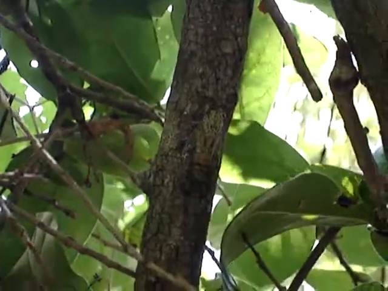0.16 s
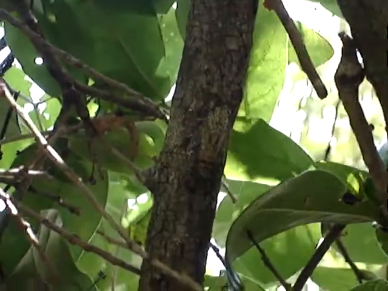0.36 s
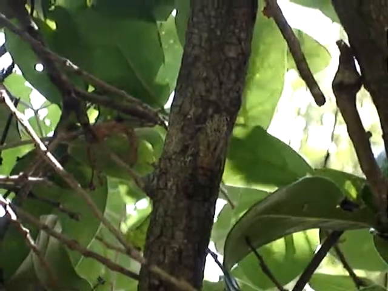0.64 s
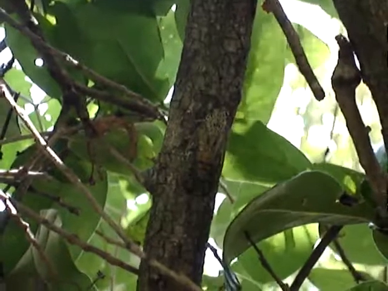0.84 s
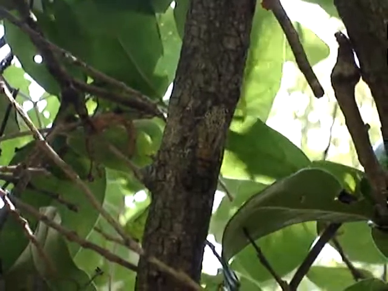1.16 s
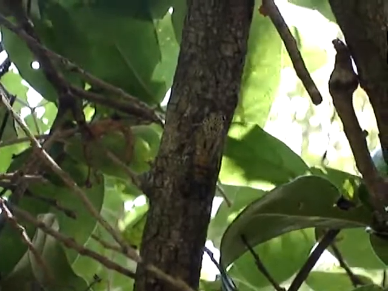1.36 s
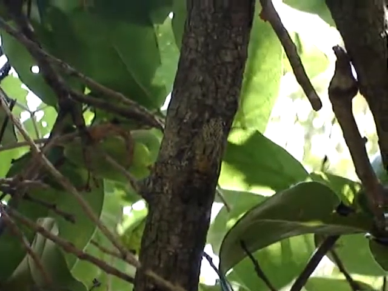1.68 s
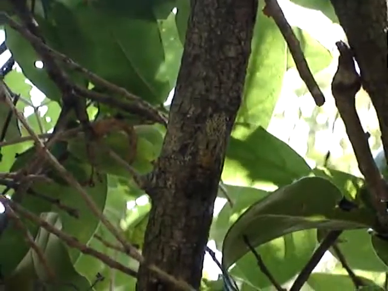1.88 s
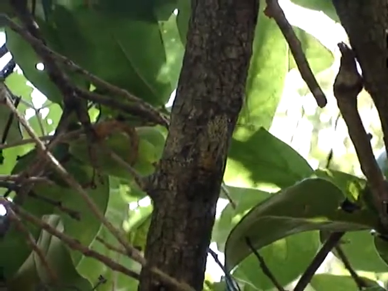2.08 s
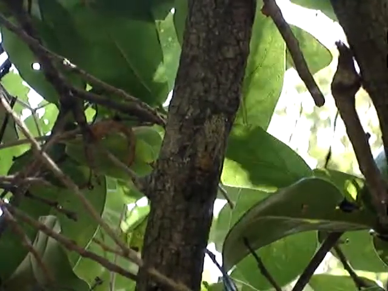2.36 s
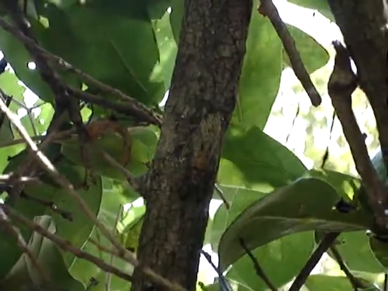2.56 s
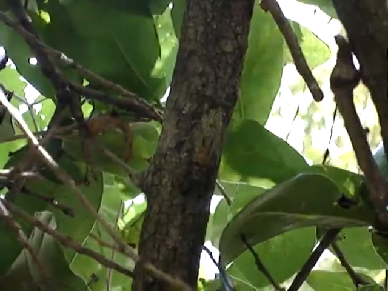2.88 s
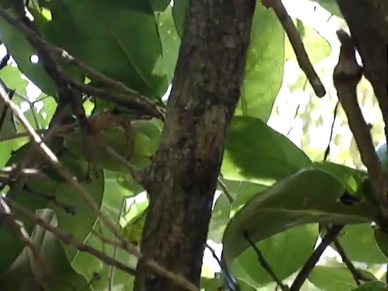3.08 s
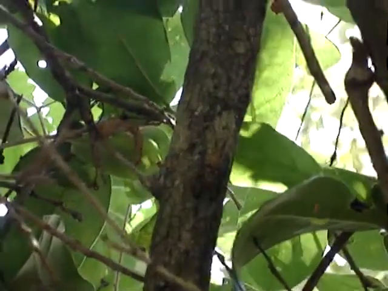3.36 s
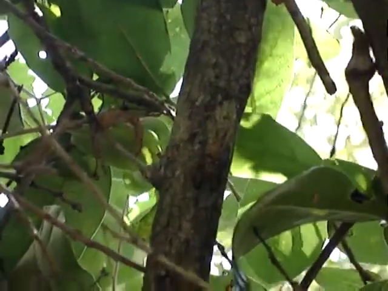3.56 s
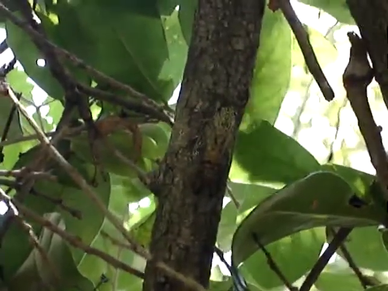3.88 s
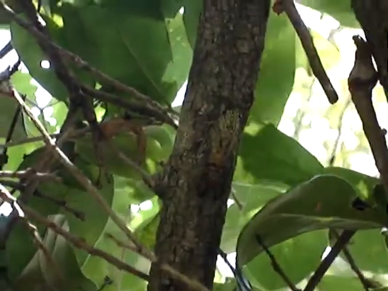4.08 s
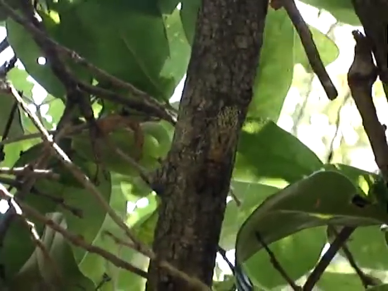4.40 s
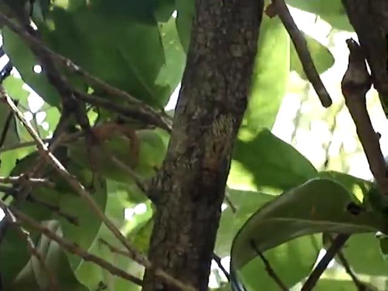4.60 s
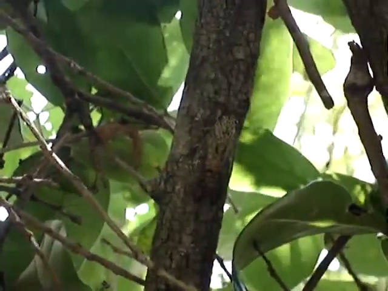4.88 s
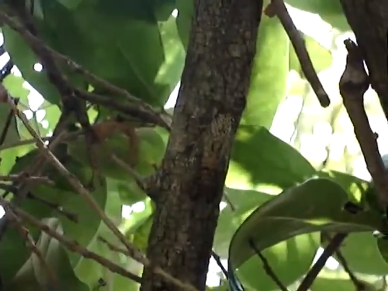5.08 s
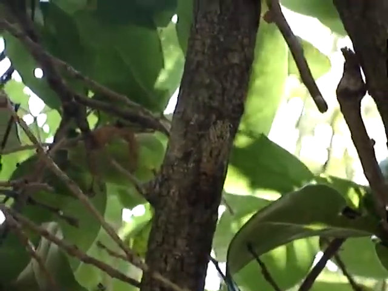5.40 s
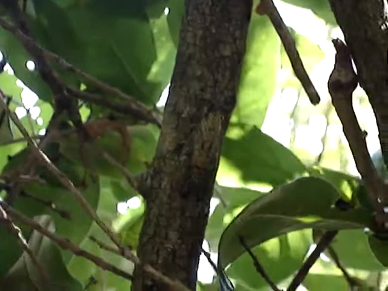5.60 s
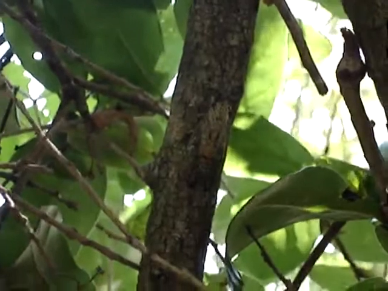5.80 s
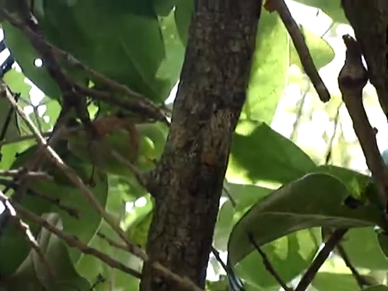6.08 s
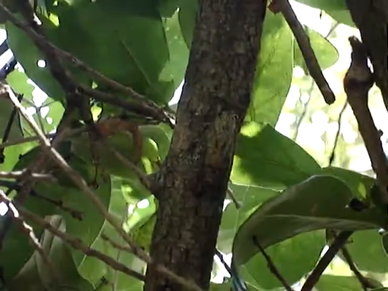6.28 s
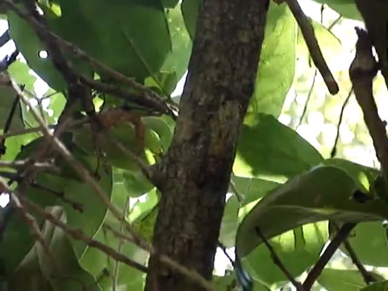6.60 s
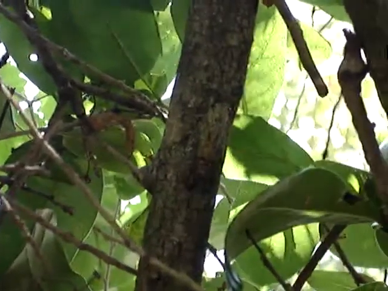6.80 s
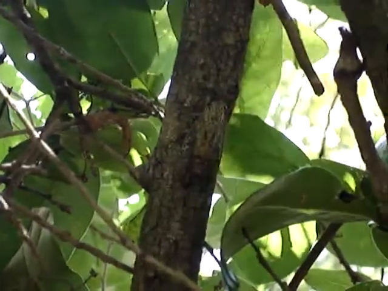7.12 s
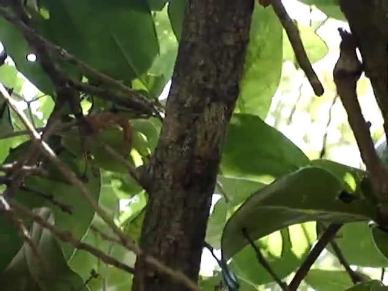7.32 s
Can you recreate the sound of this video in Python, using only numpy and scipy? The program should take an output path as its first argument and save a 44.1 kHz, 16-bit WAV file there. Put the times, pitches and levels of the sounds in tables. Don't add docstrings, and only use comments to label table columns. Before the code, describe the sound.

From 0 s a cicada very close by sings a loud, raspy, high buzz of rapid pulses around 4-5 kHz. Each phrase speeds up and brightens into a piercing 9-10 kHz ring, peaking near 0.3, 0.8, 1.3, 1.8, 2.3, 3.0 and 3.7 s, then breaks off for an instant and restarts slower. A second cicada, farther away and smeared by leaves, swells between these peaks. From about 3.9 to 5.2 s the near song is a coarser, slowing rattle, then it rests. The far one stands out, surging at 5.4, 6.05 and strongest at 6.4 s. At 6.54 s the near singer returns with quick, crowded shrill bursts until the end at about 7.45 s. Throughout, much quieter, there is distant tyre roar, fullest around 2-3 s, a faint motor hum sinking in pitch, soft leaf hiss, and low wind puffs, clearest near 5.7-6 s.

```python
import sys
import numpy as np
from scipy import signal
from scipy.io import wavfile
from scipy.ndimage import uniform_filter1d

SR = 44100
rng = np.random.default_rng(int(sys.argv[2]) if len(sys.argv) > 2 else 0)


def voltage_ratio(decibels):
    exponent = np.asarray(decibels, float) / 20
    return 10 ** exponent


def pcm_store(signal):
    levels = np.round(np.clip(np.atleast_2d(signal), -1, 1) * 32767)
    wavfile.write(sys.argv[1], SR, levels.astype(np.int16).T)


N = 328545

# start in seconds, end in seconds, drone level in dB,
# slowest speed in buckles per second, later climb in buckles per second each second.
STRETCHES = [(0, 0.412, -28, 200, 453.5), (0.445, .925, -27.5, 192, 332.5), (.957, 1.438, -27, 192, 379.5),
             (1.466, 1.73, -26.5, 189, 350.5), (1.752, 1.919, -26, 250, 0), (1.947, 2.431, -27, 196, 310.5),
             (2.461, 2.832, -25.5, 186, 158.5), (2.868, 2.909, -27, 222, 0), (2.921, 3.14, -26, 240, 0),
             (3.169, 3.541, -25.5, 184, 125.5), (3.578, 3.833, -23.5, 225, -6),
             (3.86, 4.457, -24.5, 194, -65), (4.474, 4.526, -24, 162, 0), (4.576, 5.175, -23, 146, -64.5),
             (5.2, 5.249, -23, 112, 0), (6.54, 6.825, -23, 255, -77.5), (6.84, 6.958, -22.5, 266, 0),
             (6.968, 7.328, -24.5, 300, -380), (7.338, 7.452, -23.5, 255, 0)]
# loudest moment in seconds, time the shrill ring is held in seconds,
# loudest level in dB, speed in buckles per second.
CLIMAXES = [(0.299, .115, -17.5, 338), (.818, .107, -16.5, 337), (1.322, .115, -16.5, 337),
            (1.808, .111, -16.5, 341), (2.318, .115, -16, 338), (3.018, .123, -16, 340),
            (3.703, .131, -16, 341), (6.638, 0.081, -16, 353), (6.835, .03, -16.5, 350),
            (6.96, 0.041, -16.5, 340), (7.105, 0.13, -16.5, 337), (7.333, .042, -19, 345)]
# time from the loudest moment in seconds, share taken over from the drone (0-1),
# level against the loudest in dB, shrill ring against the body in dB.
CLIMAX_BUILD = [
    (-.1, 0.037, -2.5, -9),
    (-.045, 0.44, -3, -5.5),
    (-.022, 0.92, -2.5, -8),
    (0, 0.88, 0, 5),
    (0.017, 0.88, -1, 7.5),
    (.048, 0.97, -5.5, 7.5),
]
# speed in buckles per second, shrill ring against the body in dB.
DRONE_RING = [(235, -8.5), (285, -7)]
# extra ring in dB, fade in seconds.
RESTART_RING = (3.5, 0.046)
# time in milliseconds, then drive of body, overtone and shrill ring in dB.
RIBS = [
    (.75, -9, -9, -5),
    (1.4, 0, 0, -1),
    (2.05, -5, -8, 0),
    (2.6, -14, -13, -12),
]
# shrill ring in dB, body note in Hz, snap in dB, overtone in dB,
# overtone in Hz; levels are against the body.
BELLY_STRETCH = [(-5.5, 4232, -12.5, -2.5, 8280), (0.5, 4596, -17, -3, 8710),
                 (4.5, 4624, -15.5, -10.5, 8000), (7.5, 5030, -7, -15, 6800)]
ROUGHNESS = [(285, .37), (335, .17)]
# frequency in Hz, level in dB.
AIR_SAC_MODES = [(9255, 1.5), (9617, 2), (9820, -2), (9030, -7.5)]
# time in seconds, level in dB.
FAR_DRONE = [(0, -34), (.4, -57), (3.86, -60), (4.2, -33), (5.5, -29), (6.55, -33.5), (6.8, -61),
             (7.3, -50), (7.45, -39.5)]
# loudest moment in seconds, level in dB, speed in buckles per second.
FAR_SWELLS = [(1.12, -29, 360), (1.72, -28.5, 360), (2.21, -27.5, 360), (2.85, -24.5, 360),
              (3.5, -24.5, 360), (4.09, -28.5, 360), (4.73, -22.5, 360), (5.43, -20.5, 368),
              (6.05, -27, 296), (6.43, -18, 370), (6.65, -25.5, 270)]
# time from the loudest moment in seconds, level against the loudest in dB,
# share of the speed gained (0-1), shrill ring against the body in dB.
SWELL_SHAPE = [
    (-.4, -39.5, 0.028, 2.5),
    (-.1, -10, .2, 0),
    (-.04, -2.5, .9, 0),
    (0, 0.5, 1, 1.5),
    (.04, -3, .95, -0.5),
    (.065, -5.5, .3, -0.5),
    (.3, -29, 0.015, -1.5),
]
# time in seconds, level in dB.
ROAD_LEVEL = [(0, -37), (.75, -34), (1.7, -29.5), (2.3, -30), (3, -29), (3.5, -31.5), (4.1, -32.5),
              (5.44, -34.5), (6, -31), (6.58, -30.5), (6.67, -35.5), (7.45, -41.5)]
# frequency in Hz, level in dB per Hz.
ROAD_COLOUR = [(12, -43), (20, -6), (43, -16), (108, -10), (173, -13.5), (233, -6.5), (283, -9), (434, -3),
               (597, -3.5), (896, 1.5), (1210, -2.5), (2500, -22), (3300, -24.5), (4290, -48), (7260, -120)]
# time in seconds, first order in Hz, first order in dB, second order in dB.
MOTOR = [(0, 244, -57.5, -53), (1.19, 245, -40.5, -50), (1.5, 241, -49.5, -47), (2.74, 228, -47.5, -42.5),
         (3.82, 215.5, -57.5, -45.5), (4.6, 212.3, -58, -44.5), (5.25, 209, -54, -53.5),
         (6.6, 210.4, -46.5, -45)]
# centre in seconds, level in dB, half length in seconds.
GUSTS = [(.74, -53.5, 0.097), (2.88, -48, .15), (3.318, -49, 0.059), (3.62, -43, .06), (4.3, -52, 0.14),
         (4.9, -52.5, 0.43), (5.699, -38, 0.14), (5.952, -37, 0.023), (6.199, -48, 0.2), (6.559, -47, .1),
         (7.1, -54.5, 0.42)]

HOLD_SAG_PER_S, LET_GO_S, SLOW_DOWN_S = 70, .025, .06
SETTLE_S, SPURT_AFTER_CLIMAX, SPURT_AFTER_CATCH = .12, 60, 24
LEAD_IN_S, LEAD_IN_DB, LEAD_IN_PER_S = .018, -15, 130
CATCH_ON_DB, CATCH_ON_S = -1, .015
CATCH_ACCENT_DB, CATCH_ACCENT_S = 4, .026
ENTRY_DB, ENTRY_S = -11, .037
WIND_UP_DB, WIND_UP_RING_DB, WIND_UP_S = 2.5, 7, .012
SHAKE_RAD = 1.7
BODY_LEAD_DB = 2
FAR_PER_S, FAINT_DB, FAINT_DULLING = 258, -40, 1
FAR_PITCH = 1.004
RUSTLE_DB, CALM_DB = -51, -55
DUCK_DB, DUCK_ATTACK_S, DUCK_RELEASE_S = -5.5, .038, .2
FLICK_DB, FLICK_MS = -26, .38
TOP_CUT_HZ = 10120


def rms_one(x):
    return x / np.sqrt(np.mean(x ** 2) + 1e-20)


def in_time(rows):
    s, *columns = np.transpose(rows)
    return [np.interp(np.arange(N) / SR, s, c) for c in columns]


def band(x, low_hz, high_hz, order=2):
    return signal.sosfilt(signal.butter(order, [low_hz, high_hz], "band", fs=SR, output="sos"), x)


def drift(rate_hz):
    r = np.exp(-2 * np.pi * rate_hz / SR)
    wander = signal.lfilter([1], [1, -2 * r, r * r], rng.standard_normal(N + 9000))
    return rms_one(wander[9000:])


def bump(t, at_ms, width_ms):
    return np.exp(-.5 * ((t * 1000 - at_ms) / width_ms) ** 2)


def near_song():
    from_s, share, under_db, ring_db = np.transpose(CLIMAX_BUILD)
    restart_db, restart_s = RESTART_RING
    phrases, last_end = [], 0
    for start, end, drone_db, slowest, climb in STRETCHES:
        spent = any(abs(at + held - last_end) < .01 for at, held, *_ in CLIMAXES)
        s = np.append(np.arange(start - spent * LEAD_IN_S, end, .002), end)
        age = np.maximum(s - start, 0)
        spurt = SPURT_AFTER_CLIMAX if spent else SPURT_AFTER_CATCH
        per_s = slowest + spurt * np.clip(1 - age / SETTLE_S, 0, 1) ** 1.5
        per_s = per_s + climb * np.maximum(age - SETTLE_S, 0)

        entry_db, entry_s = (CATCH_ON_DB, CATCH_ON_S) if spent else (CATCH_ACCENT_DB, CATCH_ACCENT_S)
        if start - last_end > .5:
            entry_db, entry_s = ENTRY_DB, ENTRY_S
        body = drone_db + entry_db * np.clip(1 - age / entry_s, 0, 1)
        shrill = np.interp(per_s, *np.transpose(DRONE_RING))
        shrill = shrill + restart_db * np.clip(1 - age / restart_s, 0, 1)
        body = np.where(s < start, drone_db + LEAD_IN_DB, body)
        per_s = np.where(s < start - .003, LEAD_IN_PER_S, per_s)

        if any(end - .005 < at < end + .02 for at, *_ in CLIMAXES):
            wind_up = np.clip(1 - (end - s) / WIND_UP_S, 0, .5) * 2
            body = body + WIND_UP_DB * wind_up
            shrill = shrill + WIND_UP_RING_DB * wind_up

        for at, held, top_db, top_per_s in CLIMAXES:
            if start < at + held / 2 < end:
                since = s - at
                taken = np.interp(since, from_s, share)
                on = np.clip(1 - (since - held) / LET_GO_S, 0, 1) * taken
                quick = np.clip(1 - (since - held) / SLOW_DOWN_S, 0, 1) * taken
                sagging = top_per_s - HOLD_SAG_PER_S * np.maximum(since - from_s[-1], 0)
                body = body + on * (top_db + np.interp(since, from_s, under_db) - body)
                shrill = shrill + on * (np.interp(since, from_s, ring_db) - shrill)
                per_s = per_s + quick * (sagging - per_s)
        phrases.append(np.transpose([s, body, shrill, per_s]))
        last_end = end
    return phrases


def buckles(rows, jitter):
    s, *columns = np.transpose(rows)
    fine = np.arange(s[0], s[-1] - .003, 1 / SR)
    turns = np.cumsum(np.interp(fine, s, columns[2])) / SR
    at = np.interp(np.arange(int(turns[-1]) + 1), turns, fine)
    controls = np.array([np.interp(at, s, c) for c in columns])
    soft_start_db = np.interp(at - s[0], [0, .014], [6, 0])
    controls[0] -= soft_start_db * (controls[2] < 300)
    slack = np.maximum(1 / controls[2] - .0028, 0)
    return np.vstack([at + jitter * slack * rng.standard_normal(len(at)), controls])


def singer(phrases, jitter, hoarse, uneven_db, click_db, last_db, pitch=1):
    at, body_db, shrill_db, per_s = np.hstack([buckles(p, jitter) for p in phrases])[:, :, None]
    stretch, *rules = np.transpose(BELLY_STRETCH)
    effort = np.minimum(shrill_db, np.interp(per_s, [260, 325], [-7, 7]))
    _, snap_db, over_db, over_hz = [np.interp(effort, stretch, r) for r in rules]
    body_effort = np.minimum(shrill_db + BODY_LEAD_DB, np.interp(per_s, [265, 335], [-7, 5]))
    body_hz = np.interp(body_effort, stretch, rules[0])

    start = (at * SR).astype(int)
    t = (start + np.arange(260)) / SR - at
    rough = hoarse * np.interp(per_s, *np.transpose(ROUGHNESS))
    luck = rough * rng.standard_normal((len(at), 18))
    grain = rng.standard_normal((3,) + t.shape)
    side = (-1) ** np.arange(len(at))[:, None]

    ribs = []
    for k, (ms, *_) in enumerate(RIBS):
        force = voltage_ratio(np.clip(4 * luck[:, k:k + 1], -4, 4))
        ribs.append(force * bump(t, ms + .2 * luck[:, 4 + k:5 + k], .26))
    body_push, over_push, shrill_push = [sum(voltage_ratio(row[k]) * rib for row, rib in zip(RIBS, ribs)) for k in (1, 2, 3)]

    turns = pitch * body_hz * (1 + .04 * luck[:, 8:9]) * (t - .0014)
    rise = np.interp(effort, [-7, 5], [.002, .016]) * turns ** 2
    last_rib_db = last_db - np.interp(effort, [-3, 4], [0, 7]) + np.clip(4 * luck[:, 9:10], -4, 4)
    last_rib = voltage_ratio(last_rib_db) * bump(t, 3.2, .45)
    body = body_push * np.sin(2 * np.pi * (turns + rise))
    body = body + last_rib * np.sin(2 * np.pi * 1.153 * turns + 3 * luck[:, 10:11])
    body = body + 1.5 * rough * bump(t, 2.6, 1.4) * band(grain[0], 4000, 5500, order=4)

    over_turns = over_hz * (1 + .026 * luck[:, 8:9]) * (t - .0014)
    over = over_push * np.sin(2 * np.pi * over_turns + 3 * luck[:, 11:12])
    over = over + 4 * rough * bump(t, 2.92, 1.76) * band(grain[1], 7365, 9610, order=4)

    late = t - .00003 * side
    ring = 0
    for k, (hz, db) in enumerate(AIR_SAC_MODES):
        ring = ring + voltage_ratio(db) * np.sin(2 * np.pi * hz * late + SHAKE_RAD * luck[:, 12 + k:13 + k])
    shrill = shrill_push * ring

    snap = bump(t, 1.0, .2) * np.sin(2 * np.pi * 6300 * t + 3 * luck[:, 16:17])
    snap = snap + 2.5 * rough * bump(t, 2.2, 1.3) * band(grain[2], 5500, 7600)

    total = 0
    for layer, rel_db in ((body, 0), (snap, snap_db + click_db), (over, over_db), (shrill, shrill_db)):
        energy = uniform_filter1d(np.sum(layer ** 2, axis=1), size=5)[:, None]
        total = total + layer * voltage_ratio(body_db + rel_db) / np.sqrt(energy * per_s / SR)
    total = total * voltage_ratio(uneven_db * luck[:, 17:] + .94 * side)
    out = np.zeros(N + 400)
    np.add.at(out, np.clip(start + np.arange(260), 0, N + 300), total)
    return band(out[:N], 3350, 10000, order=3)


def leaves(x, spread_ms, wet_db):
    fade = np.exp(-np.arange(2600) / SR * 1000 / spread_ms)
    clouds = rng.standard_normal((2, 2600)) * fade
    first, second = [signal.fftconvolve(x, c / np.sqrt(np.sum(c ** 2)))[:N] for c in clouds]
    sway = 2.5 * drift(1.5)
    wet = voltage_ratio(wet_db) * (np.cos(sway) * first + np.sin(sway) * second)
    return (x + wet) / np.sqrt(1 + voltage_ratio(2 * wet_db))


def far_song():
    s = np.arange(0, N / SR, .004)
    from_s, under_db, gained, ring_db = np.transpose(SWELL_SHAPE)
    power = voltage_ratio(2 * np.interp(s, *np.transpose(FAR_DRONE)))
    per_s, shrill = FAR_PER_S, 0
    for at, db, top_per_s in FAR_SWELLS:
        since = s - at
        near_it = (since > from_s[0]) & (since < from_s[-1])
        power = power + near_it * voltage_ratio(2 * (db + np.interp(since, from_s, under_db)))
        per_s = per_s + (top_per_s - FAR_PER_S) * np.interp(since, from_s, gained)
        shrill = shrill + near_it * np.interp(since, from_s, ring_db)
    body = 10 * np.log10(power)
    shrill = shrill + FAINT_DULLING * np.minimum(body - FAINT_DB, 0)
    return [np.transpose([s, body, shrill, per_s])]


def road():
    road_db, = in_time(ROAD_LEVEL)
    together = drift(3)
    edges = 20 * 2 ** np.arange(0, 7.6, 1 / 3)
    white = rng.standard_normal((2, N))
    hz, colour_db = np.transpose(ROAD_COLOUR)
    roar = 0
    for k, (low, high) in enumerate(zip(edges, edges[1:])):
        level_db = np.interp(np.log(low * high) / 2, np.log(hz), colour_db)
        flicker_db = 1.2 * together + .98 * drift(6.6)
        roar = roar + voltage_ratio(level_db + flicker_db) * band(white[k % 2], low, high)
    roar = band(roar, 12, 4100, order=4)
    return voltage_ratio(road_db) * roar / np.std(band(roar, 140, 4200))


def motor():
    hz, first_db, second_db = in_time(MOTOR)
    turns = np.cumsum(hz * (1 + .00368 * drift(5.4))) / SR
    fade = np.clip((MOTOR[-1][0] - np.arange(N) / SR) / .078, 0, 1)
    first = voltage_ratio(first_db + 1.1 * drift(3)) * np.sin(2 * np.pi * turns)
    second = voltage_ratio(second_db + 4.6 * drift(9.1)) * np.sin(4 * np.pi * turns)
    return np.sqrt(2) * fade * (first + second)


def rustle():
    return voltage_ratio(RUSTLE_DB) * rms_one(band(rng.standard_normal(N), 1200, 3300))


def gusts():
    t = np.arange(N) / SR
    blowing = sum(voltage_ratio(db) * np.exp(-((t - s) / half) ** 2) for s, db, half in GUSTS)
    return 20 * np.log10(voltage_ratio(CALM_DB) + blowing)


def wind(wind_db):
    stir = np.clip((wind_db + 56.5) / 6, 0, 1)
    puffs = rms_one(band(rng.standard_normal(N), 60, 215))
    return stir * voltage_ratio(wind_db - 2 + 4.4 * drift(13.7)) * puffs


def ducking():
    t = np.arange(N) / SR
    pressed = []
    for at, held, *_ in CLIMAXES:
        attack = (t - at) / DUCK_ATTACK_S
        release = 1 - (t - at - held) / DUCK_RELEASE_S
        pressed.append(np.clip(np.minimum(attack, release), 0, 1))
    return voltage_ratio(DUCK_DB * np.max(pressed, axis=0))


def wing_flicks():
    t = np.arange(N) / SR
    opens = [start for start, *_ in STRETCHES if any(start - .02 < at < start for at, *_ in CLIMAXES)]
    ticks = sum(bump(t - s, 1, FLICK_MS) for s in opens)
    return voltage_ratio(FLICK_DB) * ticks * rms_one(band(rng.standard_normal(N), 1500, 9000))


def scene():
    near = singer(near_song(), jitter=.07, hoarse=1.0, uneven_db=1, click_db=-1, last_db=-5.5)
    near = leaves(near, spread_ms=2.2, wet_db=-16)
    far = singer(far_song(), jitter=.35, hoarse=2.3, uneven_db=.5, click_db=-1.5, last_db=-4, pitch=FAR_PITCH)
    far = leaves(far, spread_ms=9, wet_db=-2)
    background = ducking() * (road() + motor() + rustle())
    mono = near + far + background + wind(gusts()) + wing_flicks()
    return np.array([mono, mono])


def low_pass(x):
    return signal.sosfilt(signal.butter(12, 11320, fs=SR, output="sos"), x)


def record(dry):
    bent = .94 * np.tanh((dry + .076 * dry ** 2) / .94)
    top_cut = signal.ellip(12, .5, 75, TOP_CUT_HZ, fs=SR, output="sos")
    mix = signal.sosfilt(top_cut, bent)
    return low_pass(mix)


dry = scene()
out = record(dry)
pcm_store(out)
```